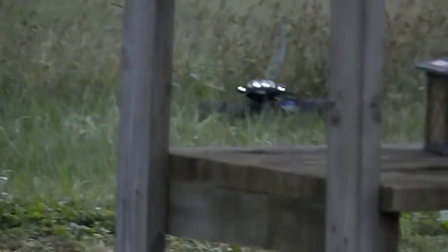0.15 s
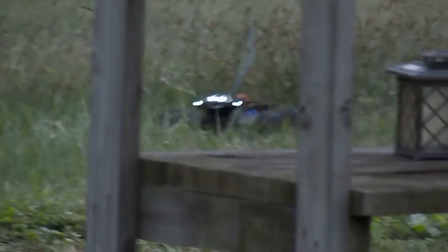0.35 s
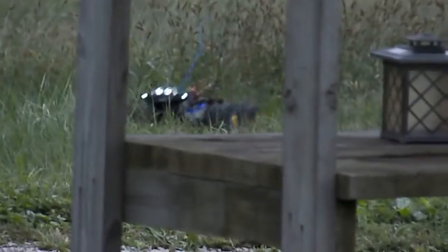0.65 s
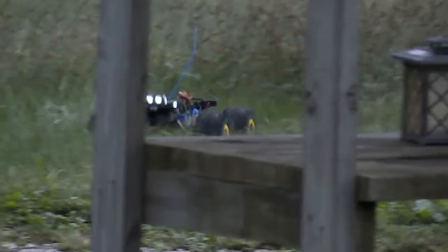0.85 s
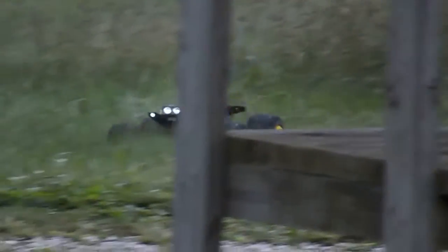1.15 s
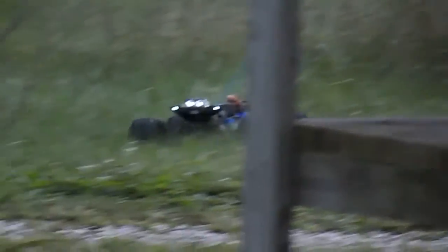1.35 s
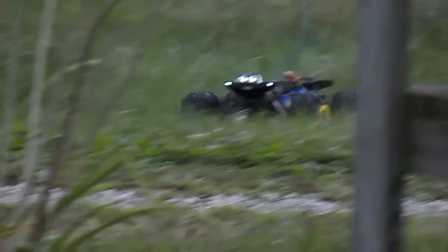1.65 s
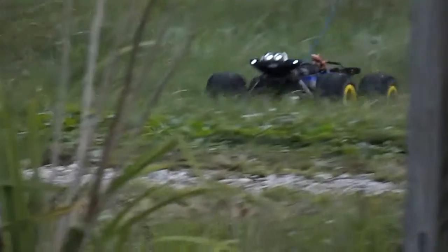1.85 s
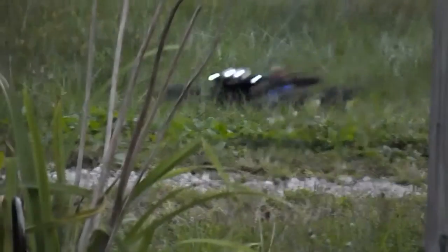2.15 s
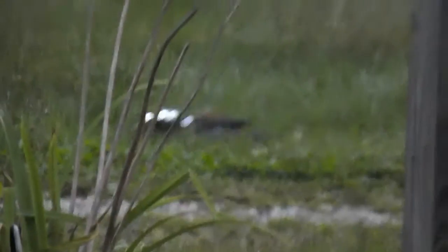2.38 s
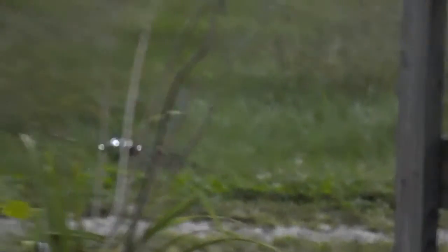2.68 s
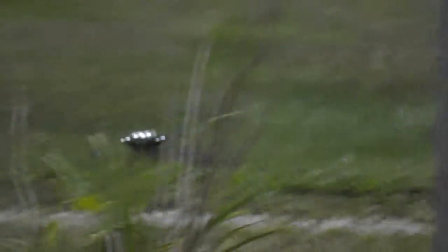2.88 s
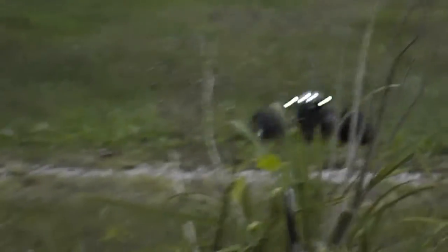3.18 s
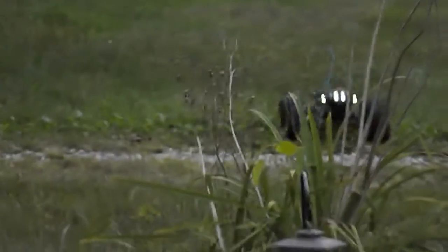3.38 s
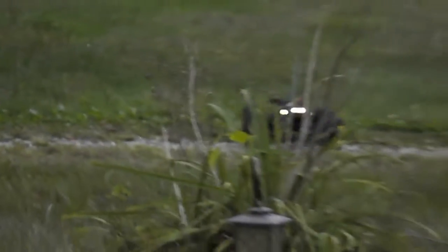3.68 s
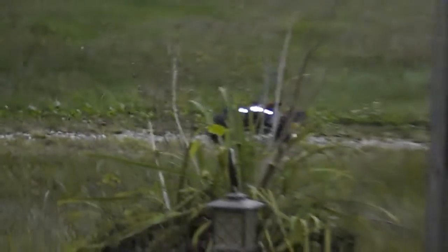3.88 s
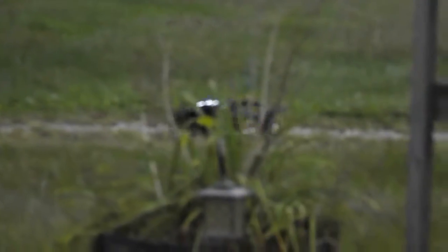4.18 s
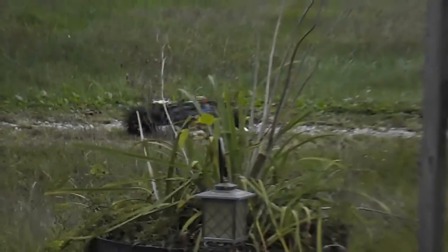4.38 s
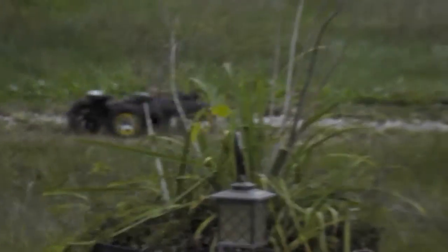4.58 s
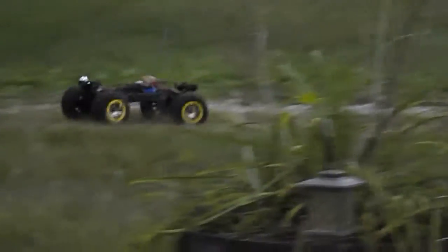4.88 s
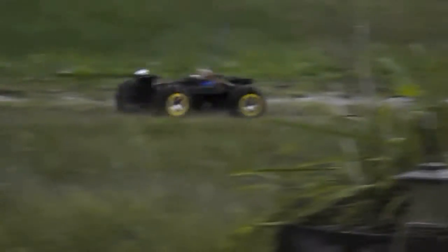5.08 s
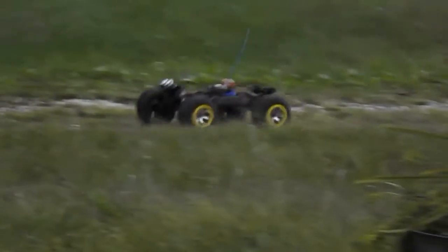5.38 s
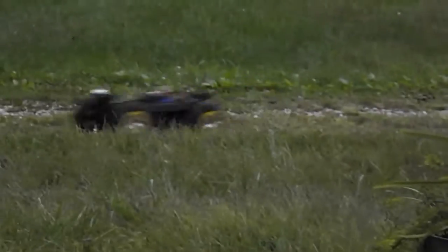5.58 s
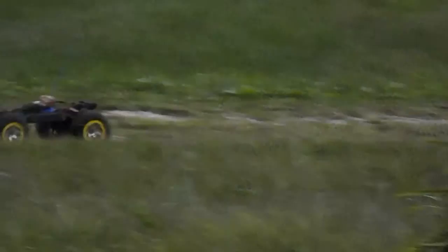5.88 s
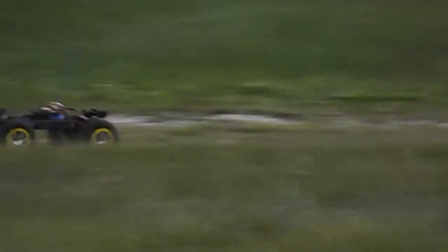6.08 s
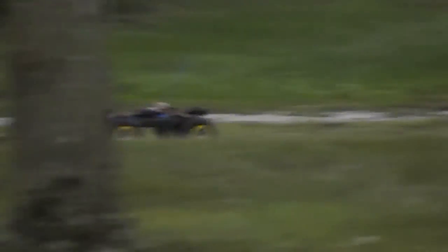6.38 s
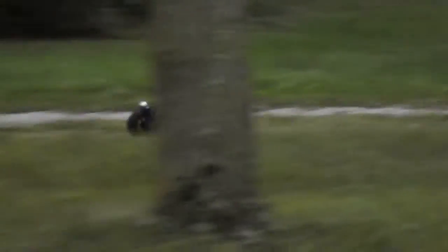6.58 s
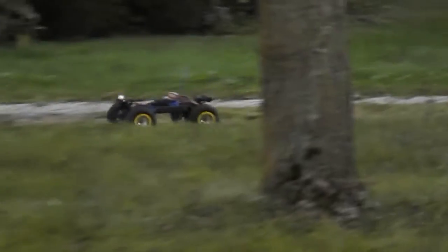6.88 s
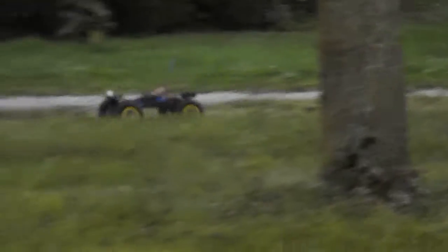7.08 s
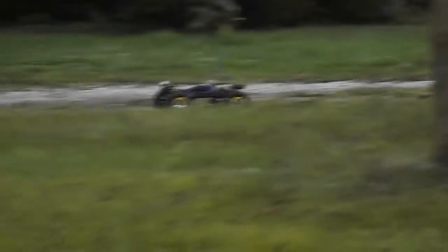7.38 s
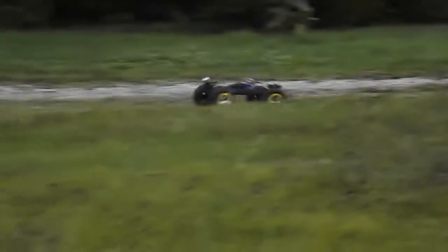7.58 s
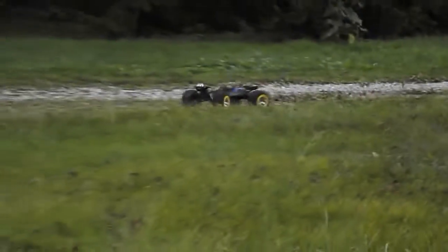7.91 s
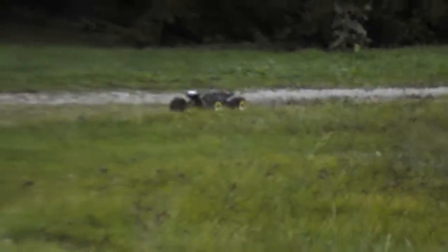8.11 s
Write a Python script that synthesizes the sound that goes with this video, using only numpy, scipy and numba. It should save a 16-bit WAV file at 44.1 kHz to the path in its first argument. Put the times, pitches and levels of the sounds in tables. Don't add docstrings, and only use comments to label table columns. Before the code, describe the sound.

High wavering gear whine of a small remote-controlled truck surges and drops over grass and gravel, with loud handheld button clicks and soft lens hiss.

```python
import sys
import numpy as np
from scipy import signal
from scipy.fft import rfft, irfft
from scipy.io import wavfile
from scipy.ndimage import uniform_filter1d
from numba import njit

SR = 44100
rng = np.random.default_rng(int(sys.argv[2]) if len(sys.argv) > 2 else 0)


def makeup_ratio(level_db):
    decades = np.asarray(level_db, float) / 20
    return 10 ** decades


def wav_out(sig):
    wavfile.write(sys.argv[1], SR, np.round(np.clip(np.atleast_2d(sig).T, -1, 1) * 32767).astype(np.int16))


N = 363825
T = np.arange(N) / SR

# (time [s], pinion mesh [Hz], mesh level [dB], motor whistle level [dB])
PULL_AWAY = [(.21, 3350, -58, -85),(.25, 3300, -74, -85), (.33, 3130, -64, -85), (.375, 3330, -57, -68),
             (.4, 3150, -74, -60), (.435, 3380, -58, -56), (.48, 3560, -66, -58), (.55, 3790, -57, -58),
             (.63, 3620, -64, -59)]
FIRST_DASH = [(.63, 3660, -59, -59), (.72, 3970, -52, -68), (.806, 4045, -56, -62), (.866, 3910, -51, -66),
              (.95, 3940, -53, -63), (1.01, 4065, -55, -61), (1.07, 4005, -53, -60),
              (1.128, 4025, -53, -60), (1.212, 4125, -59, -59)]
EASE_OFF = [(1.212, 4125, -59, -59), (1.252, 4050, -53, -60), (1.29, 4010, -59, -61),
            (1.338, 4015, -55, -62), (1.372, 3870, -57, -72), (1.41, 3600, -65, -90),
            (1.484, 3175, -59, -95), (1.51, 3050, -71, -95), (1.75, 2250, -71, -95)]
SECOND_DASH = [(1.97, 3050, -72, -59), (2.05, 3190, -63, -55), (2.082, 3225, -56, -57),
               (2.138, 3275, -59, -59), (2.2, 3570, -58, -63), (2.25, 3660, -60, -66),
               (2.328, 3875, -53, -71), (2.46, 3930, -58, -67), (2.61, 4025, -57, -64)]
TUFTS = [(2.61, 4025, -57, -64), (2.72, 3970, -54, -63), (2.8, 4000, -61, -63), (2.866, 3955, -52, -65),
         (2.916, 3810, -58, -68), (3.0, 3800, -59, -68), (3.058, 3900, -56, -68), (3.084, 3870, -50, -68),
         (3.116, 3700, -58, -68)]
BRAKE = [(3.116, 3700, -58, -68), (3.19, 3865, -53, -64), (3.222, 3550, -67, -72), (3.248, 3730, -56, -80),
         (3.29, 3885, -54, -85), (3.33, 3750, -66, -85), (3.47, 3800, -68, -85), (3.5, 3480, -57, -85),
         (3.55, 3170, -53, -85)]
TURN = [(4.15, 3270, -53, -52), (4.23, 3250, -57, -52), (4.3, 3150, -67, -55), (4.4, 3280, -61, -55),
        (4.48, 3240, -58, -50), (4.61, 3205, -56, -63), (4.714, 2995, -60, -62), (4.74, 2890, -69, -66),
        (4.83, 2540, -74, -80)]
CLIMB = [(5.22, 3010, -72, -48), (5.32, 2770, -76, -49), (5.355, 3030, -57, -64), (5.414, 3220, -53, -56),
         (5.472, 3190, -57, -59), (5.54, 3335, -52, -52), (5.594, 3245, -49, -57), (5.67, 3460, -50, -54),
         (5.75, 3545, -55, -60)]
STRAIGHT = [(5.75, 3545, -57, -58), (5.84, 3620, -61, -64), (5.95, 3730, -57, -55), (6.07, 3800, -57, -56),
            (6.13, 3905, -51, -57), (6.234, 3945, -49, -57), (6.34, 3890, -52, -56), (6.37, 4110, -57, -54)]
FLAT_OUT = [(6.37, 4110, -57, -54), (6.44, 4150, -58, -52), (6.52, 4105, -58, -51), (6.62, 4190, -58, -59),
            (6.68, 4200, -67, -64), (6.74, 4310, -61, -67), (6.87, 4310, -59, -64), (6.9, 4280, -61, -64)]
COAST = [(6.9, 4280, -63, -85), (6.96, 3900, -54, -85), (7.1, 3240, -48, -85), (7.13, 3100, -62, -80),
         (7.2, 2800, -70, -70), (7.25, 2930, -56, -58), (7.33, 2920, -56, -59), (7.37, 2700, -65, -72),
         (7.5, 2300, -69, -85)]
RESTART = [(7.58, 3000, -60, -85), (7.61, 3270, -49, -82), (7.64, 3560, -52, -80), (7.654, 3665, -60, -65),
           (7.685, 3745, -52, -51), (7.715, 3500, -56, -53), (7.765, 3265, -52, -56), (7.8, 3410, -48, -44),
           (7.834, 3540, -52, -50)]
AWAY = [(7.834, 3540, -54, -52), (7.864, 3825, -53, -66), (7.9, 3920, -48, -52), (7.93, 3810, -51, -53),
        (7.97, 3975, -53, -59), (8.06, 4035, -50, -64), (8.105, 4000, -57, -47), (8.134, 3960, -53, -56),
        (8.174, 4110, -51, -59), (8.25, 4110, -47, -55)]
LEGS = [PULL_AWAY, FIRST_DASH, EASE_OFF, SECOND_DASH, TUFTS, BRAKE, TURN,
        CLIMB, STRAIGHT, FLAT_OUT, COAST, RESTART, AWAY]
# (time [s], half length [s], speed lost [share])
BOGS = [(.9, .08, .012), (1.11, .09, .02), (2.02, .05, .03), (4.28, .11, .12), (5.59, .04, -.02),
        (6.22, .12, .035), (6.345, .04, -.03), (7.75, .055, -.085), (7.9, .03, .012), (8.0, .08, .022),
        (8.105, .03, -.03), (8.2, .1, .012)]
# (time [s], level [dB])
AXLE_LEVEL = [(.4, -69), (2.1, -66), (2.5, -63.5), (3.3, -66), (4.2, -65), (4.6, -60), (5, -83),
              (5.5, -54.5), (5.75, -63.5), (7.4, -61.5), (8.25, -59.5)]
# (start [s], end [s], first pitch [Hz], last pitch [Hz], level [dB])
SQUEALS = [(1.3, 1.6, 3900, 4500, -60), (2.202, 2.45, 2420, 2650, -62), (2.8, 3.1, 2640, 2540, -61.5),
           (2.6, 3.33, 1750, 1770, -61.5), (4.218, 4.286, 3430, 3300, -52.5),
           (4.415, 4.704, 1600, 1470, -58), (4.75, 5.12, 1470, 1450, -60), (7.681, 7.856, 1630, 1700, -61),
           (7.684, 7.825, 2000, 1900, -55.5), (7.2, 7.33, 3320, 3450, -66),
           (5.25, 5.314, 3300, 3150, -51.5), (5.368, 5.613, 1600, 1420, -56.5),
           (7.152, 7.625, 1530, 1300, -59.5), (7.697, 7.84, 4200, 3900, -43),
           (7.905, 7.935, 2600, 2550, -48), (8.105, 8.155, 2840, 2650, -48), (7.72, 7.76, 3800, 3300, -54),
           (8.2, 8.25, 3400, 3350, -49), (7.88, 8.0, 4800, 4750, -52)]
# (time [s], level [dB])
ROLL_LEVEL = [(0, -74), (.17, -62), (.25, -47), (1.3, -48), (1.6, -56), (1.88, -50), (2.1, -50),
              (3.3, -42.5), (3.6, -44), (4.08, -51), (4.4, -47.5), (4.7, -44.5), (5.15, -53), (5.4, -47),
              (5.85, -41), (6.4, -41), (7.15, -41.5), (7.25, -38.5), (7.4, -46), (7.63, -45), (7.7, -36.5),
              (8.25, -39)]
# (frequency [Hz], density [dB])
RUSH_SPECTRUM = [(290, -38), (500, -21), (908, -3.5), (1230, -5), (3320, -1), (5280, -1), (7830, 7.5),
                 (14400, -16.5), (15300, -16), (16200, -65)]
# (time [s], level [dB])
RUMBLE_LEVEL = [(0, -65), (2.4, -59.5), (4.2, -53), (5.3, -62), (6.4, -52.5), (7.7, -54), (8.25, -55.5)]
# (frequency [Hz], density [dB])
RUMBLE_SPECTRUM = [(35, -67), (60, -42), (86, -53), (107, -0.5), (227, 1), (347, -0.5), (381, -10.5),
                   (499, -2), (1000, -10.5), (1300, -39), (2200, -120)]
# (frequency [Hz], width [Hz], level [dB])
CHASSIS = [(1470, 630, -28), (2500, 600, -28), (3326, 87, -17.5), (3970, 150, -17), (4870, 170, -18),
           (6270, 1000, 2.5)]
# (time [s], extra level [dB])
JOLTS = [
    (1.93, 9),
    (4.12, 13.5),
    (5.19, 14.5),
    (6.0, 7.5),
    (7.78, -1.5),
    (7.89, 1),
]
# (start [s], end [s], level [dB], start-up surge [dB])
LENS_RUNS = [
    (1.921, 2.034, -53.5, 2),
    (2.05, 4.062, -57, -14),
    (4.12, 4.233, -58, 10),
    (4.382, 4.65, -57, 0),
    (6.02, 6.125, -54, 3),
    (6.13, 6.24, -65, 0),
    (6.237, 6.457, -54, -1),
    (6.484, 6.902, -58.5, 4.5),
    (6.907, 7.66, -56.5, 7),
    (7.66, 8.25, -55, 0),
]
# (frequency [Hz], width [Hz], level [dB])
LENS_BODY = [(2550, 930, -3), (4630, 1760, 3.5), (6880, 1560, 3.5), (11760, 860, 3.5), (13600, 2300, -7.5)]
# (start [s], end [s])
LENS_STRAIN_SPAN = (4.1, 4.7)
# (time [s], peak [dB], ringing [Hz], treble share [dB])
BUTTONS = [(1.866, -30, 3880, -22), (1.917, -41, 2300, -18), (1.9255, -36, 2300, 11),
           (1.936, -28, 7000, -3), (1.942, -29, 3730, -6), (1.946, -31.5, 3900, 6), (3.369, -15, 4010, 6.5),
           (3.385, -30, 3300, -10), (4.111, -37, 2380, -7), (4.125, -31, 2240, 7), (4.127, -26, 7200, 0),
           (4.142, -34.5, 1560, -21), (4.143, -28, 3530, -7), (4.213, -31, 1510, -10),
           (4.707, -35, 3340, -17), (4.817, -39, 3000, -15), (5.131, -33, 3940, -14),
           (5.432, -40, 7400, -5), (5.46, -35.5, 3660, -12), (6.023, -36, 1970, -13),
           (6.036, -32.5, 7200, 3), (6.104, -28, 3840, -3), (6.111, -34.5, 1720, 10)]
# (time [s], peak [dB], ringing [Hz], treble share [dB])
TAPS = [(0.368, -36.5, 1500, -8), (1.12, -25, 1514, 15.5), (1.209, -33, 1980, -21), (1.243, -36, 1420, -6),
        (1.288, -27.5, 865, -8), (1.306, -18, 1700, 9.5), (1.774, -37, 900, -6), (2.013, -33, 1520, -5),
        (2.139, -34, 1480, 0), (2.895, -36.5, 1230, -8), (3.068, -37, 2030, -15), (3.306, -44, 1620, -10),
        (3.401, -30, 2080, -6), (3.446, -28, 2290, 5.5), (3.675, -35.5, 790, -1), (5.231, -38, 880, 5),
        (6.772, -36, 1300, -12), (6.854, -34.5, 1380, -3), (7.104, -35, 1510, 5), (7.109, -16, 1920, 5.5),
        (7.592, -38, 606, -18), (8.01, -37, 890, -16)]
# (time [s], peak [dB], ringing [Hz], treble share [dB])
RATCHET = [(3.333, -22.5, 2010, 9.5), (3.355, -19, 2420, 10.5), (3.388, -20.5, 2500, 5.5),
           (3.414, -24.5, 2460, 12), (3.432, -23, 6200, 9.5), (4.766, -25.5, 2410, 4.5),
           (5.187, -26.5, 2440, 5), (5.19, -23.5, 2400, -12), (5.203, -23.5, 2430, 9),
           (5.216, -24, 2460, -6), (5.22, -29.5, 2440, 6), (5.232, -39, 2460, 0), (5.993, -23.5, 2450, 4.5)]
# (frequency [Hz], 60 dB decay [s], level [dB])
CASE_MODES = [(790, 0.034, -19), (1226, 0.047, -20.5), (2100, 0.035, -35), (2538, 0.022, -8.5),
              (4280, 0.021, -9.5), (6335, 0.023, -9)]
# (time [s], left minus right [dB], modes as (frequency [Hz], peak [dB], 60 dB decay [s]))
BLOWS = [
    (1.1206, -4.5, [(760, -41, 0.058), (1524, -28, 0.039), (1200, -29, 0.03), (2020, -19, 0.017), (2960, -27.5, 0.029), (4730, -19, .015), (7100, -20, 0.019)]),
    (1.3053, -4.5, [(770, -32.5, 0.048), (1520, -33, 0.049), (2080, -10, 0.0076), (2970, -23, 0.017), (4490, -25, 0.018), (7750, -24, 0.025), (9470, -13, 0.0053)]),
    (3.368, 8.5, [(1040, -33, 0.029), (1730, -23, 0.015), (2920, -18, 0.016), (3740, -8.5, 0.013), (4290, -9, 0.012), (5180, -6, 0.01)]),
    (7.1094, -5, [(604, -26, 0.018), (763, -27, .03), (993, -31.5, 0.055), (1254, -29, 0.051), (2410, -10, 0.0089), (3350, -20, 0.016), (4170, -14, 0.014), (6600, -14, 0.014), (9000, -9, 0.007)]),
]
# (time [s], level [dB], pitch [Hz], 60 dB decay [s])
KNOCKS = [(2.281, -40, 356, .1), (2.32, -39.5, 315, 0.14), (2.53, -40, 318, 0.15),
          (2.691, -30.5, 326, 0.051), (2.808, -39, 308, 0.062), (3.335, -39.5, 890, 0.5),
          (3.4, -41, 695, 0.37), (4.119, -32, 363, 0.036), (5.19, -45, 892, 0.53), (5.19, -35, 682, 0.093),
          (7.701, -33, 267, 0.074), (8.17, -51.5, 896, 0.38)]
# (start [s], end [s], level [dB])
CHIRPS = [
    (0.214, 0.351, -53),
    (.68, .78, -61),
    (.89, 1.036, -55),
    (1.6, 1.78, -55.5),
    (2.3, 2.446, -60),
    (3.71, 3.78, -55),
    (7.96, 8.1, -62),
]
# (time [s], level [dB])
IDLE_LEVEL = [(0, -64.5), (3.2, -58.5), (4, -83), (8.25, -88)]
# (frequency [Hz], density [dB])
AIR_SPECTRUM = [(24, -66), (40, -16.5), (357, -1.5), (606, -6.5), (2080, -10), (2300, -9.5), (3910, -17.5),
                (6300, -4), (8740, -16.5), (15200, -16), (16400, -45)]
# (frequency [Hz], correlation [-1..1])
AIR_LIKENESS = [(60, 0.9), (500, 0.33), (1400, 0.48), (3000, 0.21), (6500, -0.34), (15000, 0.16)]
# (frequency [Hz], gain [dB])
MIC_RESPONSE = [(20, -20), (100, -18), (250, -3), (400, 0), (4900, 0), (5400, -4), (5900, 0), (15300, -1),
                (16400, -6), (16800, -50)]

TRUCK_PAN_DB = -2
CLICK_LAG = 4
SQUEAL_WIDTH = .03


def level(x, db=0):
    return x * makeup_ratio(db) / np.sqrt(np.mean(x ** 2))


@njit
def svf(x, hz, width):
    y, b, l = np.empty(len(x)), 0., 0.
    for i in range(len(x)):
        g, k = np.tan(np.pi * hz[i] / SR), width / hz[i]
        v = (b + g * (x[i] - l)) / (1 + g * (g + k))
        b, l, y[i] = 2 * v - b, l + 2 * g * v, k * v
    return y


def band(x, hz, width_hz):
    return svf(x, hz + np.zeros(len(x)), 1. * width_hz)


def butter(x, hz, kind):
    return signal.sosfilt(signal.butter(2, hz, kind, fs=SR, output="sos"), x)


def walk(rate):
    k = int(SR / rate)
    held = np.repeat(rng.standard_normal(N // k + 1), k)
    return level(uniform_filter1d(held, k)[:N])


def over_time(table):
    return np.interp(T, *np.transpose(table))


def on_log(table, hz):
    table_hz, value = np.transpose(table)
    return np.interp(np.log(np.maximum(hz, 1)), np.log(table_hz), value)


def decay(age, t60):
    return np.exp(-np.log(1000) * age / t60)


def tone(hz):
    return np.sqrt(2) * np.sin(2 * np.pi * np.cumsum(hz) / SR)


def strand(hz, width_hz):
    narrow = band(rng.standard_normal(N), hz, width_hz)
    return level(band(narrow, hz, 4 * width_hz))


def place(x, pan_db, lag=2):
    left, right = x * makeup_ratio(pan_db / 2), x * makeup_ratio(-pan_db / 2)
    return np.array([np.roll(left, int(lag)), right])


def wide(spectrum, alike):
    hz = np.fft.rfftfreq(N, 1 / SR)
    likeness = np.clip(alike(hz), -.95, .95)
    noise = rfft(rng.standard_normal((2, N))) * makeup_ratio(on_log(spectrum, hz))
    mid, side = noise * np.sqrt([1 + likeness, 1 - likeness])
    return level(irfft([mid + side, mid - side], N))


def truck():
    jolt_db = np.zeros(N)
    for s, db in JOLTS:
        age = np.maximum(T - s, 0)
        jolt_db += db * np.minimum(age / .0044, 1) * np.exp(-age / .21)
    throttle = drive()[-1]
    middle_db = over_time(ROLL_LEVEL) + jolt_db
    treble_db = middle_db + 2 + 1.5 * throttle
    grit_db = (1.5 + .12 * jolt_db) * walk(300)
    rush = wide(RUSH_SPECTRUM, lambda hz: .55 - hz / 30000) * makeup_ratio(1.1 * walk(30) + grit_db)
    rush += [sum(makeup_ratio(g) * level(band(r, f, w)) for f, w, g in CHASSIS) for r in rush]
    low, high = butter(rush, 6000, "low"), butter(rush, 6000, "high")
    rolling = level(low, 1.0) * makeup_ratio(middle_db) + level(high, -2.55) * makeup_ratio(treble_db)
    rolling = rolling * makeup_ratio(np.array([[.5], [-.5]]) * TRUCK_PAN_DB)
    rumble = wide(RUMBLE_SPECTRUM, lambda hz: .68 + 0 * hz)
    rumble = rumble * makeup_ratio(over_time(RUMBLE_LEVEL) + 1.54 * walk(12))
    return gears() + squeals() + rolling + rumble


def gears():
    hz, db, motor_hz, motor_db, gate, lost, throttle = drive()
    slip = np.minimum(abs(lost) / .08, 1)
    wavering_hz = hz * (1 + .003 * walk(60) + .002 * walk(14))
    mesh = (1 - .5 * slip) * tone(wavering_hz) * makeup_ratio(db + 1.3 + 1.5 * walk(40))
    mesh += strand(hz, 120) * makeup_ratio(db - 11 + 10 * slip)
    shaky_hz = motor_hz * (1 + .003 * walk(70) + .004 * walk(15))
    whistle = .4 * tone(shaky_hz) + .92 * strand(shaky_hz, 290)
    effort = throttle * makeup_ratio(motor_db + 2.6 * walk(50))
    slipping = makeup_ratio(-17 + 8 * slip) * strand(.425 * motor_hz, 80)
    axle, idler = strand(.188 * motor_hz, 55), strand(.281 * motor_hz, 55)
    lower = (axle + makeup_ratio(-2) * idler) * makeup_ratio(over_time(AXLE_LEVEL))
    near = place(gate * mesh + effort * slipping + throttle * lower, TRUCK_PAN_DB)
    near = near + place(effort * whistle, TRUCK_PAN_DB, lag=0)
    echo_s = .22
    return near + makeup_ratio(-18) * np.roll(near, int(echo_s * SR), axis=1) * (T > echo_s)


def drive():
    hz, db, motor_db, gate = bursts(LEGS)
    lost = sum(share * np.maximum(1 - abs(T - s) / half, 0) for s, half, share in BOGS)
    motor_hz = hz / .428 * (1 - lost)
    throttle = gate * np.clip((motor_db + 78) / 10, 0, 1)
    return hz, db, motor_hz, motor_db, gate, lost, throttle


def bursts(tables, fade_s=.0059):
    s, *columns = np.transpose(np.concatenate(tables))
    gate = sum((T > t[0][0]) & (T < t[-1][0]) for t in tables)
    return [np.interp(T, s, c) for c in columns] + [uniform_filter1d(1. * gate, int(fade_s * SR))]


def squeals():
    out = np.zeros(N)
    for a, b, first_hz, last_hz, db in SQUEALS:
        i, n = int(a * SR), int((b - a) * SR)
        hz = np.linspace(first_hz, last_hz, n)
        width_hz = SQUEAL_WIDTH * first_hz
        sung = band(band(rng.standard_normal(n), hz, width_hz), hz, 3 * width_hz)
        out[i:i + n] += level(sung, db) * signal.windows.tukey(n, .3)
    return place(out, TRUCK_PAN_DB)


def lens():
    run = np.zeros(N)
    for a, b, db, surge_db in LENS_RUNS:
        run += (T > a) * (T < b) * makeup_ratio(db + surge_db * np.exp(-abs(T - a) / .034))
    start, end = LENS_STRAIN_SPAN
    strain = 1 - .027 * (T > start) * (T < end)
    step_hz = 160 * (1 + .1 * walk(8))
    step_db = 7 * np.sin(2 * np.pi * np.cumsum(step_hz) / SR) / 2
    rub = rng.standard_normal((2, N)) * makeup_ratio(1.5 * walk(170) + step_db)
    body = np.zeros((2, N))
    for f, w, g in LENS_BODY:
        hz = f * strain
        body += [makeup_ratio(g) * level(band(band(r, hz, w), hz, 2 * w)) for r in rub]
    heard = place(body[0], 18.1) + makeup_ratio(-9) * body[1] * np.array([[0], [1]])
    return heard * uniform_filter1d(run, int(.004 * SR)) * makeup_ratio(-4.5 + .9 * walk(14))


def clicks():
    out, t = np.zeros((2, N)), np.arange(int(.08 * SR)) / SR
    for s, db, hz, treble_db, t60, pan_db, case_db in struck():
        rise = np.minimum(t / (.022 * t60), 1)
        fall = np.exp(-np.maximum(t - .04 * t60, 0) / (.055 * t60))
        shared, opposed = rng.standard_normal((2, len(t))) * rise * fall
        snap = shared + .5 * opposed * np.array([[1], [-1]])
        ring = 9.9 * butter(snap, [600, 5500], "band")
        modes = [(f, mode_t60, g + case_db) for f, mode_t60, g in CASE_MODES] + [(hz, .35 * t60, -5)]
        for f, mode_t60, g in modes:
            mode_t60 = min(mode_t60, t60)
            spread = .04 if f != hz else .01
            mode_hz = f * (1 + spread * rng.standard_normal())
            mode = makeup_ratio(g) * decay(t, mode_t60) * np.sin(2 * np.pi * mode_hz * t)
            rung = signal.fftconvolve(snap, mode[None] * np.sqrt(.073 / mode_t60))
            ring = ring + rung[:, :len(t)]
        ring = butter(ring, 500, "high")
        crack = butter(snap, [4000, 11800], "band")
        hit = ring / abs(ring).max() + makeup_ratio(treble_db - 5.5) * crack / abs(crack).max()
        hit[0] = np.roll(hit[0], CLICK_LAG)
        i = int(s * SR) - int(.0008 * SR)
        out[:, i:i + len(t)] += makeup_ratio(db + 3.5) * hit * makeup_ratio(np.array([[pan_db], [-pan_db]]) / 2)
    return out


def struck():
    kinds = [(BUTTONS, (.021, 13.5, -10.5)), (TAPS, (.058, -6, 1.2)), (RATCHET, (.039, -7, 1.2))]
    return sorted(tuple(row) + setting for table, setting in kinds for row in table)


def blows():
    out = np.zeros((2, N))
    for s, pan_db, modes in BLOWS:
        age = np.maximum(T - s, 0)
        ring = sum(makeup_ratio(db) * decay(age, t60) * np.sin(2 * np.pi * hz * age) for hz, db, t60 in modes)
        out += place(ring * (1 - np.exp(-age / .0013)) * makeup_ratio(6), pan_db, lag=CLICK_LAG)
    return out


def knocks():
    out = np.zeros(N)
    for s, db, hz, t60 in KNOCKS:
        age = np.maximum(T - s, 0)
        swell = 1 - np.exp(-age / .0052)
        out += makeup_ratio(db) * swell * decay(age, t60) * np.sin(2 * np.pi * hz * age)
    return out


def cricket():
    gate = sum(makeup_ratio(db) * (T > a) * (T < b) for a, b, db in CHIRPS)
    beat_hz, wing_hz = 68.4, 7200
    beat = np.exp(-(T * beat_hz % 1) / .14)
    wings = level(band(beat * rng.standard_normal(N), wing_hz, 170))
    return place(gate * wings, 1)


def chorus():
    hz, width_hz = 6630, 980
    noise = rng.standard_normal((2, N))
    hum = np.array([band(band(n, hz, width_hz), hz, 1.6 * width_hz) for n in noise])
    hum = hum + hum[0] * np.array([[.4], [-.4]])
    return level(hum, -60) * makeup_ratio(1.2 * walk(15))


def engine():
    firing_hz = 36.37 * (1 + .002 * walk(2.31))
    turns = np.cumsum(firing_hz) / SR
    pulses = np.diff(np.floor(turns), prepend=0) * makeup_ratio(.95 * walk(30))
    pipe = band(band(pulses, 426, 93), 393, 230)
    pipe += .35 * band(band(pulses, 560, 90), 413, 200)
    return level(pipe) * makeup_ratio(over_time(IDLE_LEVEL))


def air():
    noise = wide(AIR_SPECTRUM, lambda hz: on_log(AIR_LIKENESS, hz))
    return noise * makeup_ratio(-50.5 + 1.4 * walk(16))


def scene():
    in_hand = lens() + clicks() + blows() + knocks()
    return truck() + in_hand + cricket() + chorus() + engine() + air()


def roll_off(x):
    return signal.sosfilt(signal.butter(12, 16630, fs=SR, output="sos"), x)


def record(dry):
    response = makeup_ratio(on_log(MIC_RESPONSE, np.fft.rfftfreq(N, 1 / SR)))
    heard = irfft(rfft(np.clip(dry, -1, 1)) * response, N)
    mix = np.clip(heard, -1, 1)
    return roll_off(mix)


dry = scene()
out = record(dry)
wav_out(out)
```